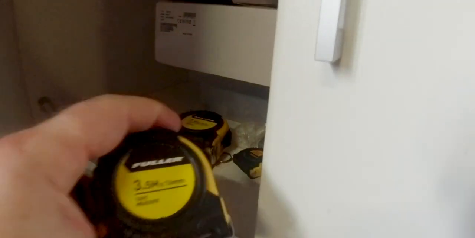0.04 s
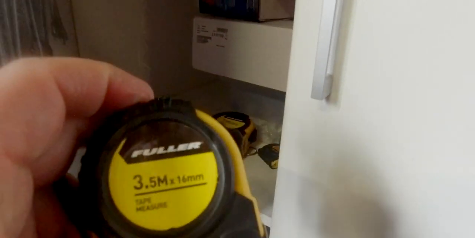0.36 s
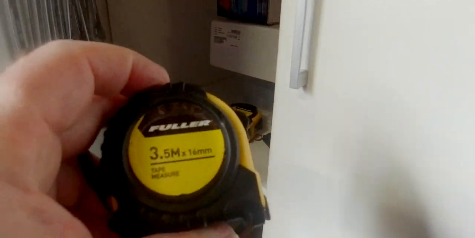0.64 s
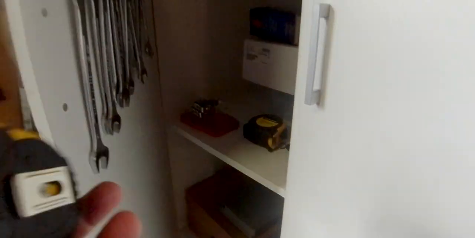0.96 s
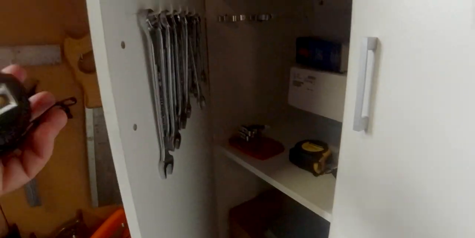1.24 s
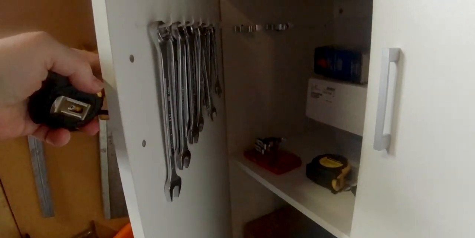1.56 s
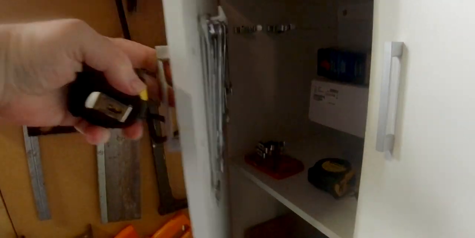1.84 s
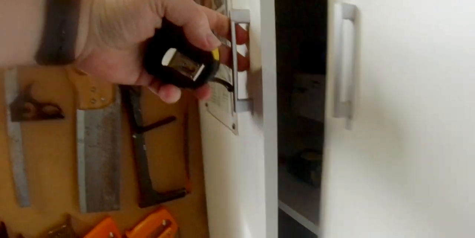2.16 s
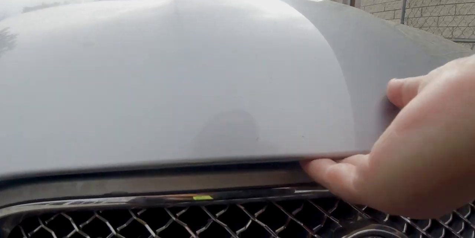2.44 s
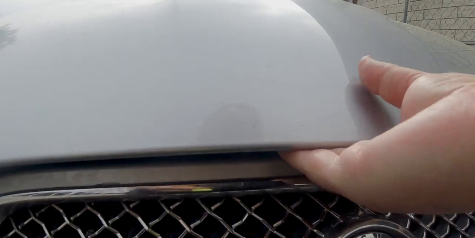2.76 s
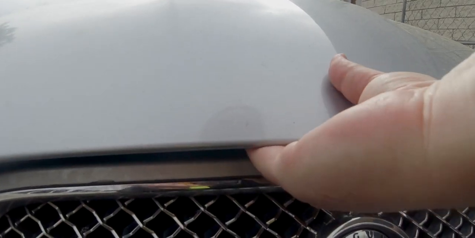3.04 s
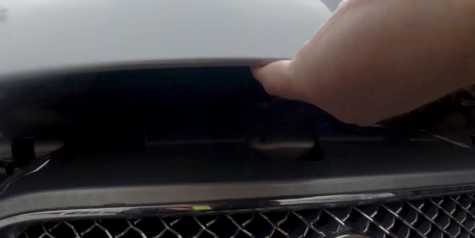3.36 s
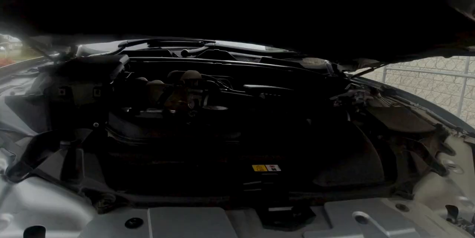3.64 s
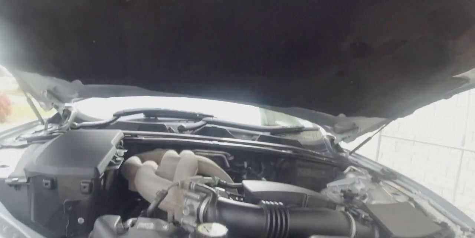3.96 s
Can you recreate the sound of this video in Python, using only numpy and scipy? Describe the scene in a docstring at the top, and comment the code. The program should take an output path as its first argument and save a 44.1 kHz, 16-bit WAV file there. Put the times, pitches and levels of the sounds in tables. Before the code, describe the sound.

Metal wrenches clink on a swinging cabinet door, then a car bonnet clunks and groans open.

```python
"""Clinking wrenches, then a car bonnet.

In a garage, steel wrenches hanging in a swinging cabinet door clink together and knock on the panel;
air buffets the microphone. The scene cuts to a quiet yard: a bonnet catch snaps, the bonnet lifts
with a juddering stick-slip groan from its hinge, and its gas struts hiss."""
import sys
import numpy as np
from scipy import signal
from scipy.fft import rfft, irfft, next_fast_len
from scipy.io import wavfile
from scipy.ndimage import uniform_filter1d

SR = 44100
rng = np.random.default_rng(int(sys.argv[2]) if len(sys.argv) > 2 else 0)


def unload_audio(sound):
    """Save the sound as a 16-bit wav file, at the path given as the first command line argument."""
    columns = np.transpose(np.atleast_2d(sound))
    # keep every value between -1 and 1, then stretch to whole-number steps
    steps = np.round(np.clip(columns, -1, 1) * 32767)
    wavfile.write(sys.argv[1], SR, steps.astype(np.int16))


N = 176400

# Modes, keyed by wrench. Each row: frequency in Hz, level in dB.
WRENCH_MODES = { "a": [(1340, -6.5), (3208, -14), (5873, -7.5), (8861, 0), (12490, -18.5), (15600, -16)],
                "b": [(1238, 1), (5168, -18.5), (7763, -21.5), (8597, -4), (12750, -10.5), (15740, -10.5)],
                "c": [(3321, -12), (5798, -4.5), (8742, -2.5), (13580, -2)], "d": [(1583, -6), (3020, -14)],
                "e": [(8753, -2.5), (10950, 2.5), (12770, -2), (15270, -4.5)], "f": [(4600, 2.5),
                (10300, -3)], "g": [(1163, -7), (1663, 10.5), (10770, -1)]}
# Wrench on wrench. Each row: start in seconds, wrench, level in dB, nominal T60 in seconds.
CLINKS = [(0.25, "c", -40, 0.14), (0.369, "b", -25.5, 0.15), (0.43, "b", -32, 0.15), (.670, "a", -18, 0.24),
          (0.767, "f", -33, 0.021), (0.864, "d", -19.5, 0.12), (1.206, "f", -48, 0.02),
          (1.401, "f", -35.5, 0.045), (1.449, "a", -24.5, 0.19), (1.633, "e", -28, 0.25),
          (1.694, "c", -30, 0.12), (1.791, "g", -19, 0.052)]
# Wrench on door. Each row: start in seconds, panel level in dB, clack level in dB.
KNOCKS = [(0.0, -23.5, -25.5), (0.182, -30.5, -48.5), (.206, -38, -34.5), (0.247, -37.5, -30.5),
          (0.37, -36, -30.5), (.44, -35.5, -36.5), (0.534, -48, -36.5), (0.673, -41.5, -38),
          (0.829, -45, -36), (0.863, -42, -39), (1.091, -60, -33.5), (1.148, -43, -32), (1.206, -48, -37),
          (1.553, -46, -38), (1.603, -34.5, -26.5), (1.632, -26.5, -26.5), (1.691, -29.5, -19.5),
          (1.752, -36, -20.5), (1.788, -24, -21), (1.8, -24.5, -16.5), (1.862, -35.5, -30)]
# Bright steel-on-steel scrapes. Each row: start in seconds, level in dB.
SCRAPES = [(.004, -31.5), (.064, -41), (1.207, -32), (1.432, -31), (1.633, -30), (1.693, -28),
           (1.79, -23.5), (1.863, -32.5)]
# Low, middle and bright parts of a knock. Each row: frequency in Hz, relative level in dB.
PANEL_SPECTRUM = [(50, -19), (210, -1.5), (700, -6), (1600, -19)]
CLACK_SPECTRUM = [(400, -21.5), (1000, 3.5), (1800, -0.5), (3200, -10), (6500, -32), (11000, -64.5)]
STEEL_SPECTRUM = [(1500, -11), (3500, 9), (12000, -2), (15500, -21)]

# Catch blows on the bonnet. Each row: start in seconds, thud level in dB, click level in dB.
CATCH_BLOWS = [(3.0049, -19.5, -16.5), (3.0094, -11.5, -24.5), (3.216, -28.5, -37), (3.296, -46, -33)]
# Bonnet thud and catch click. Each row: frequency in Hz, relative level in dB.
THUD_MODES = [(273.4, 3.5), (229, -8.5), (330.6, 3)]
CLICK_SPECTRUM = [(300, 5), (1400, 9.5), (4000, -22), (15000, -55.5)]
# Bonnet resonances. Each row: frequency in Hz, bandwidth in Hz, relative gain in dB.
BONNET_MODES = [(66, 32.5, -13), (179, 19, -7), (298, 107, -10.5), (476, 9.8, 5.5), (580, 14.2, 0),
                (793, 30.5, -11), (904, 150, -20), (1720, 140, -34.5)]
# Groan, strut hiss and hinge rub over time. Each row: time in seconds, level in dB.
GROAN_ENVELOPE = [(3.365, -27), (3.374, -13), (3.485, -13.5), (3.56, -36.5), (3.62, -51.5)]
STRUT_ENVELOPE = [(3.17, -89), (3.26, -48), (3.38, -49), (3.62, -68), (3.738, -43.5), (3.825, -34.5),
                  (3.875, -47), (4, -46)]
RUB_ENVELOPE = [(3.1, -74), (3.3, -38), (3.6, -53.5), (3.845, -28.5), (3.89, -44.5), (4, -37.5)]
# Strut hiss and hinge rub. Each row: frequency in Hz, relative level in dB.
STRUT_SPECTRUM = [(1600, -25.5), (2600, -5.5), (4000, -16.5), (15500, -22.5)]
RUB_SPECTRUM = [(100, -7), (550, 3), (1250, -2), (2200, -23.5)]
# Faint hinge ringing. Each row: frequency in Hz, peak time in seconds, level in dB.
HINGE_RINGS = [(1284, 3.266, -45.5), (3746, 3.33, -57), (2770, 3.775, -46)]

# Air pushing on the microphone. Each row: centre in seconds, half width in seconds, level in dB.
PUFFS = [(2.04, 0.021, -12), (2.192, 0.0094, -22.5)]
# Treble hiss of the garage air and the ambient air over time. Each row: time in seconds, level in dB.
SWISH_ENVELOPE = [(1.0, -86), (1.2, -57), (1.6, -57), (1.9, -51.5)]
GARAGE_ENVELOPE = [(0, -43), (1.88, -44.5), (1.95, -50), (2.23, -48.5)]
YARD_ENVELOPE = [(2.285, -53), (2.5, -46), (4, -42)]
# Ambient air. Each row: frequency in Hz, relative level in dB.
GARAGE_SPECTRUM = [(35, -1.5), (80, -8), (370, -10.5), (3200, -34), (10000, -41.5), (15500, -51.5)]
YARD_SPECTRUM = [(30, -1), (430, -2.5), (1700, -16.5), (4200, -27), (10000, -56.5)]
# Stereo likeness. Each row: frequency in Hz, left-right correlation.
CORRELATION = [(30, 0.93), (300, 0.99), (1000, 0.95), (4000, 0.16)]

CLINK_RISE_S, LOW_DAMPING_HZ, HIGH_DAMPING_HZ = 0.00075, 1900, 14900
NEIGHBOUR_DB, NEIGHBOUR_T60_S = -13.5, 0.069
CHATTER_START_S, CHATTER_END_S, CHATTER_DB = 1.64, 1.83, -38.5
PANEL_T60_S, CLACK_T60_S, SCRAPE_T60_S, DOOR_STEREO_LAG_S = 0.2, 0.078, 0.08, 0.00005
BURST_RISE_S, MODE_SCATTER_DB = 0.0011, 4
THUD_T60_S, CLICK_T60_S = 0.17, 0.075
SLIP_HZ, SLIP_JITTER_S, SLIP_SCATTER_DB, FRICTION_DB = 97.5, 0.00034, 3.5, 4
RING_HALF_WIDTH_HZ, RING_HALF_WIDTH_S, GRAIN_DB = 54, 0.13, 2.5
REVERB_T60_S, REVERB_DB = 0.16, -13
GARAGE_END_S, YARD_START_S, CUTOFF_HZ = 2.232, 2.285, 15850


def wrenches(chatter):
    """Struck wrenches ring; their neighbours and the chatter add a short jangle."""
    clinks = np.zeros((2, N))
    for s, wrench, db, t60_s in CLINKS:
        tone = ring(WRENCH_MODES[wrench], t60_s, CLINK_RISE_S, spread=1.25, damping_hz=LOW_DAMPING_HZ)
        add(clinks, s, amp(db) * tone)
    neighbours = [(s, db + NEIGHBOUR_DB) for s, _, db, _ in CLINKS]
    return clinks + bursts(neighbours + chatter, STEEL_SPECTRUM, NEIGHBOUR_T60_S, rough=0.1)


def door_knocks(chatter):
    """Wrenches hit the door: panel boom, contact clack and steel scrape."""
    panel = bursts([(s, db) for s, db, _ in KNOCKS], PANEL_SPECTRUM, PANEL_T60_S, rough=0.5)
    clack = bursts([(s, db) for s, _, db in KNOCKS] + chatter, CLACK_SPECTRUM, CLACK_T60_S, rough=0.4)
    scrape = bursts(SCRAPES, STEEL_SPECTRUM, SCRAPE_T60_S, rough=0.87)
    delay_s = DOOR_STEREO_LAG_S * np.array([[-0.5], [0.5]])
    return filtered(panel + clack + scrape, lambda hz: np.exp(-2j * np.pi * hz * delay_s))


def cabinet():
    """Loose wrenches bounce on the swinging door; the chatter drives both steel and door."""
    bounces_s = np.linspace(CHATTER_START_S, CHATTER_END_S, num=16) + rng.normal(scale=0.004, size=16)
    chatter = [(s, CHATTER_DB + rng.normal(scale=2)) for s in bounces_s]
    return wrenches(chatter) + door_knocks(chatter)


def catch():
    """The catch clicks and the bonnet answers with a thud."""
    thuds = np.zeros((2, N))
    for s, db, _ in CATCH_BLOWS:
        add(thuds, s, amp(db) * ring(THUD_MODES, THUD_T60_S, rise_s=0.004, spread=0.12, damping_hz=100))
    clicks = bursts([(s, db) for s, _, db in CATCH_BLOWS], CLICK_SPECTRUM, CLICK_T60_S, rough=0.57)
    return thuds + clicks


def bonnet_response(hz):
    """Bonnet resonances of alternating sign, low-passed."""
    modes = sum((-1) ** k * amp(db) * 1j * hz * width_hz / (mode_hz ** 2 - hz ** 2 + 1j * hz * width_hz)
                for k, (mode_hz, width_hz, db) in enumerate(BONNET_MODES))
    return modes / (1 + (hz / 2200) ** 4)


def groan():
    """The hinge sticks and slips, shaking the bonnet's resonances."""
    start_s, end_s = GROAN_ENVELOPE[0][0], GROAN_ENVELOPE[-1][0]
    count = int((end_s - start_s) * SLIP_HZ)
    jitter, size = rng.standard_normal((count, 2)).T
    slips_s = start_s + (np.arange(count) - 1) / SLIP_HZ + SLIP_JITTER_S * jitter
    slips = np.bincount((slips_s * SR).astype(int), amp(SLIP_SCATTER_DB * size), N)
    friction = amp(FRICTION_DB) * noise([(1600, -9), (3500, -19.5)])
    shake = filtered(slips * np.sqrt(SR / SLIP_HZ) + friction, bonnet_response)
    running_power = np.abs(uniform_filter1d(np.mean(shake ** 2, axis=0), size=1500))
    return envelope(GROAN_ENVELOPE) * shake / np.sqrt(running_power + 1e-12)


def struts_and_hinges():
    """Gas hisses grainily through the struts while the hinges rub and ring."""
    t = np.arange(N) / SR
    grain = amp(GRAIN_DB * unit_rms(uniform_filter1d(rng.standard_normal(N), size=200)))
    rings = np.zeros((2, N))
    for ring_hz, peak_s, db in HINGE_RINGS:
        band = lambda hz: 1 / (1 + ((hz - ring_hz) / RING_HALF_WIDTH_HZ) ** 4)
        swell = amp(db) * np.exp(-((t - peak_s) / RING_HALF_WIDTH_S) ** 2)
        rings += swell * unit_rms(filtered(noise(STRUT_SPECTRUM), band))
    hiss = envelope(STRUT_ENVELOPE) * noise(STRUT_SPECTRUM)
    rub = envelope(RUB_ENVELOPE) * noise(RUB_SPECTRUM)
    return rings + grain * (hiss + rub)


def puffs():
    """Slow pressure swings of moving air on the microphone."""
    t = np.arange(N) / SR
    pressure = np.zeros(N)
    for centre_s, half_width_s, db in PUFFS:
        offset = (t - centre_s) / half_width_s
        pressure -= amp(db) * (1 - offset ** 2) * np.exp(-offset ** 2)
    return pressure


def air_hiss():
    """Faint treble hiss of the garage air."""
    return envelope(SWISH_ENVELOPE) * noise(STEEL_SPECTRUM)


def with_reverb(x):
    """x plus the garage's short, dull tail."""
    tail = noise([(1000, 5.5), (12000, -2.0)])[:, :SR // 2] * decay(REVERB_T60_S, rise_s=0.018)
    wet = signal.fftconvolve(x, tail / np.linalg.norm(tail[0]), axes=1)[:, :N]
    return x + amp(REVERB_DB) * wet


def ring(modes, t60_s, rise_s, spread, damping_hz):
    """Damped sines, shorter below damping_hz and above HIGH_DAMPING_HZ; spread scales stereo phase."""
    t = np.arange(SR // 2) / SR
    out = np.zeros((2, len(t)))
    for hz, db in modes:
        freedom = np.tanh(hz / damping_hz) ** 2
        stereo_rad = spread * freedom * (1 + 0.18 * rng.normal()) * np.array([[-0.5], [0.5]])
        mode_t60_s = t60_s * freedom / (1 + (hz / HIGH_DAMPING_HZ) ** 10)
        tone = np.sin(2 * np.pi * hz * t + stereo_rad)
        out += amp(db + rng.normal()) * decay(mode_t60_s, rise_s) * tone
    return out


def bursts(hits, spectrum, t60_s, rough):
    """Each (s, dB) hit excites 28 random short-lived modes, plus noise scaled by rough."""
    t = np.arange(SR // 4) / SR
    out = np.zeros((2, N))
    grit = noise(spectrum)
    grid_hz = np.geomspace(spectrum[0][0], spectrum[-1][0], num=28)[:, None]
    fade = decay(t60_s, BURST_RISE_S)[:len(t)]
    for s, db in hits:
        detune, size, phase, spread = rng.standard_normal((4, len(grid_hz), 1))
        hz = grid_hz * np.exp(0.04 * detune)
        gain = amp(log_interp(spectrum, hz) + MODE_SCATTER_DB * size) * np.sqrt(hz)
        phase_rad = 2 * np.pi * (hz * t + phase)
        stereo_rad = spread * stereo_angle_rad(hz)
        modes = np.array([np.sum(gain * np.sin(phase_rad + side * stereo_rad), 0) for side in (-1, 1)])
        scrape = np.roll(grit, -round(s * SR), axis=1)[:, :len(t)]
        add(out, s, amp(db) * fade * (unit_rms(modes) + rough * scrape))
    return out


def noise(spectrum):
    """Unit-RMS stereo noise, wide in the treble, rolling off above the last (Hz, dB) point."""
    def mid_side_gain(hz):
        gain = amp(log_interp(spectrum, hz)) / np.maximum(1, hz / spectrum[-1][0]) ** 2
        angle_rad = stereo_angle_rad(hz)
        return gain * [np.cos(angle_rad), np.sin(angle_rad)]
    mid, side = filtered(rng.standard_normal((2, N)), mid_side_gain)
    return unit_rms(np.array([mid + side, mid - side]))


def stereo_angle_rad(hz):
    """Mid-side angle that gives CORRELATION at hz."""
    return np.arccos(np.clip(log_interp(CORRELATION, hz), -1, 1)) / 2


def decay(t60_s, rise_s):
    """Quick rise, exponential fall."""
    t = np.arange(SR // 2) / SR
    return amp(-60 * t / t60_s) * (1 - np.exp(-t / rise_s))


def envelope(points):
    """Gain per sample from (s, dB) points, zero outside them."""
    s, db = np.transpose(points)
    t = np.arange(N) / SR
    return amp(np.interp(t, s, db)) * (t >= s[0]) * (t <= s[-1])


def filtered(x, response):
    """Apply a complex frequency response."""
    size = next_fast_len(N + SR // 2)
    return irfft(rfft(x, size) * response(np.fft.rfftfreq(size, 1 / SR)), size)[..., :N]


def log_interp(points, hz):
    """Interpolate (Hz, value) points on a log axis."""
    points_hz, values = np.transpose(points)
    return np.interp(np.log(hz + 1), np.log(points_hz + 1), values)


def add(out, start_s, x):
    i = max(round(start_s * SR), 0)
    out[..., i:i + x.shape[-1]] += x[..., :N - i]


def amp(db):
    return 10 ** (np.asarray(db) / 20)


def unit_rms(x):
    return x / np.sqrt(np.mean(x ** 2) + 1e-20)


def scene():
    """Garage, brief silence, yard; each place has its own ambient air."""
    t = np.arange(N) / SR
    garage = with_reverb(cabinet()) + puffs()
    garage += envelope(GARAGE_ENVELOPE) * noise(GARAGE_SPECTRUM) + air_hiss()
    yard = catch() + groan() + struts_and_hinges()
    yard += envelope(YARD_ENVELOPE) * noise(YARD_SPECTRUM)
    return garage * (t < GARAGE_END_S) + yard * (t > YARD_START_S)


def record(dry):
    """Brick-wall low-pass."""
    return filtered(dry, lambda hz: hz < CUTOFF_HZ)


dry = scene()
out = record(dry)
unload_audio(out)
```